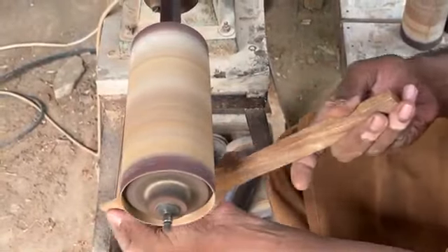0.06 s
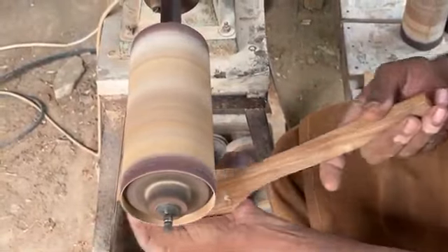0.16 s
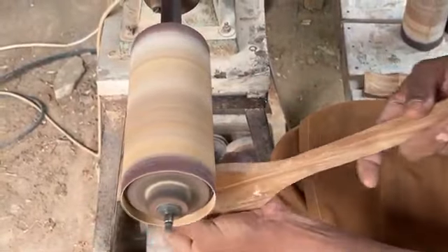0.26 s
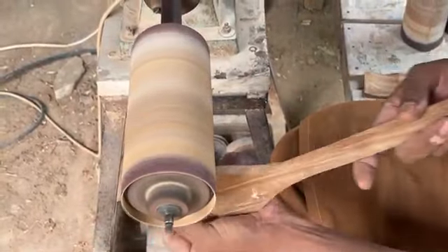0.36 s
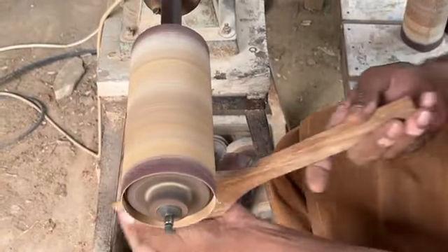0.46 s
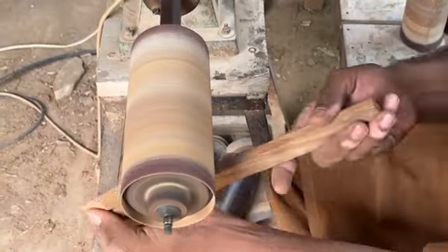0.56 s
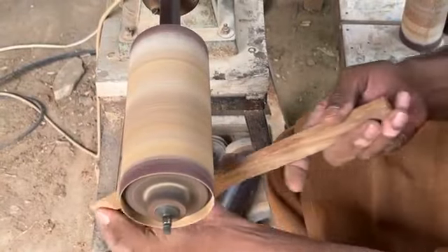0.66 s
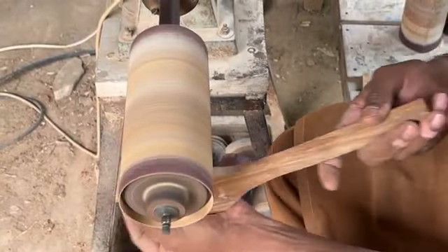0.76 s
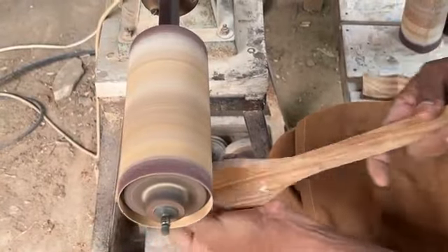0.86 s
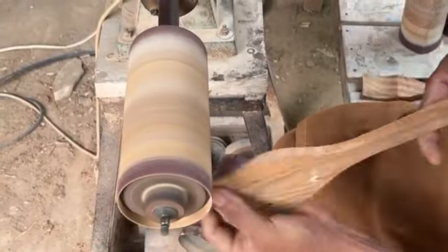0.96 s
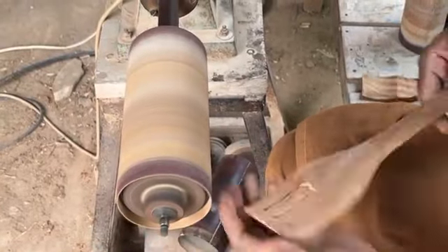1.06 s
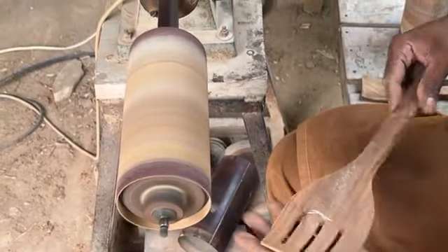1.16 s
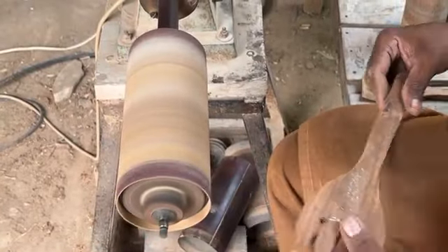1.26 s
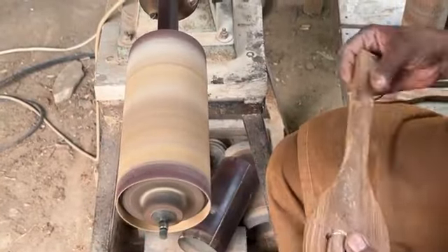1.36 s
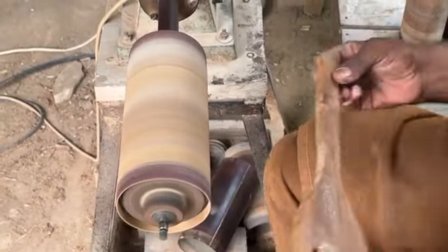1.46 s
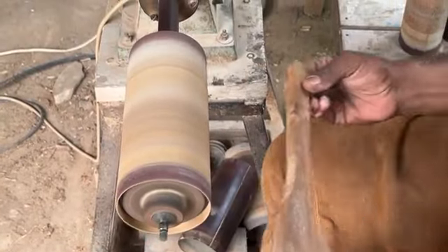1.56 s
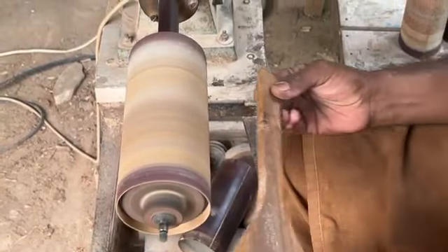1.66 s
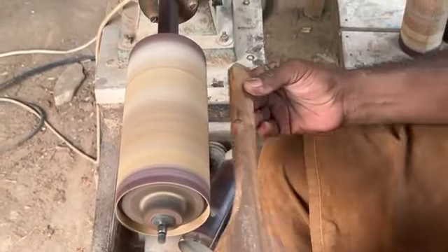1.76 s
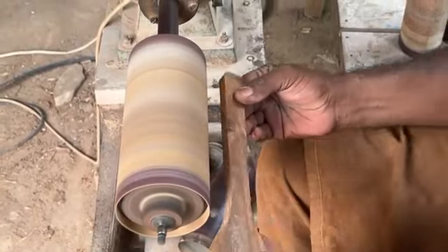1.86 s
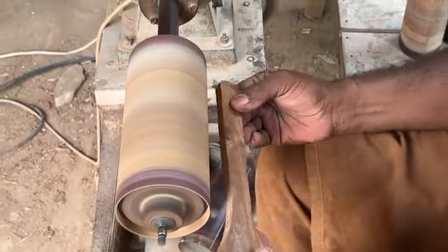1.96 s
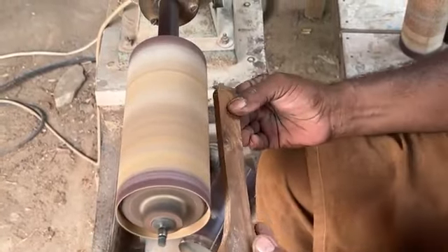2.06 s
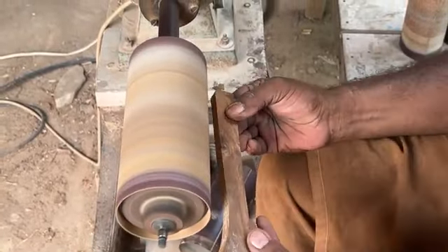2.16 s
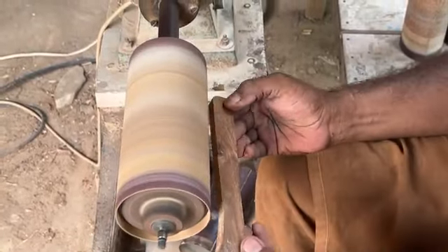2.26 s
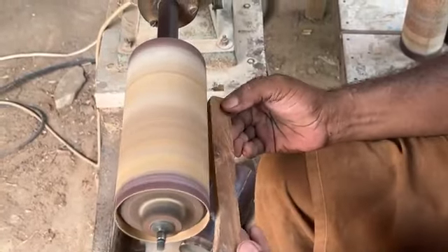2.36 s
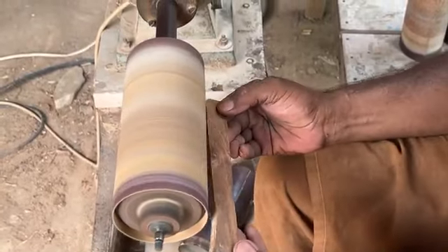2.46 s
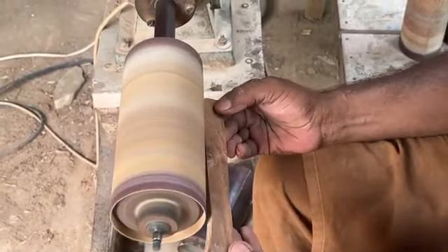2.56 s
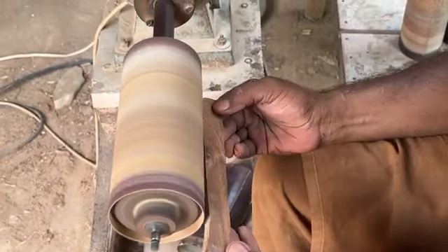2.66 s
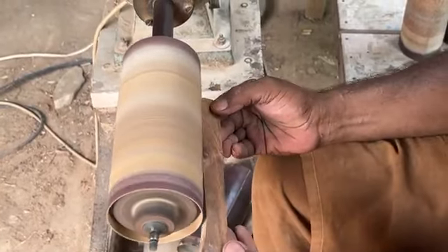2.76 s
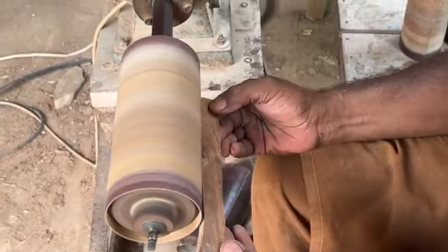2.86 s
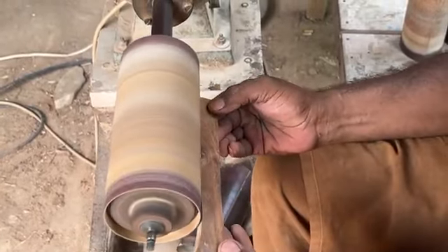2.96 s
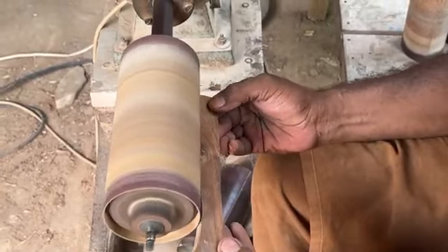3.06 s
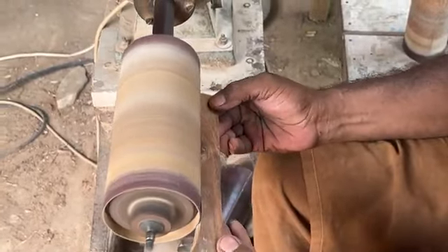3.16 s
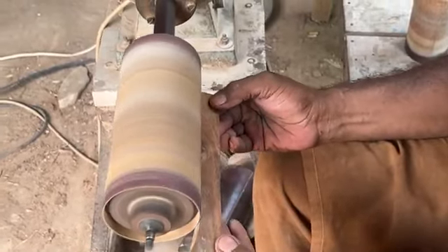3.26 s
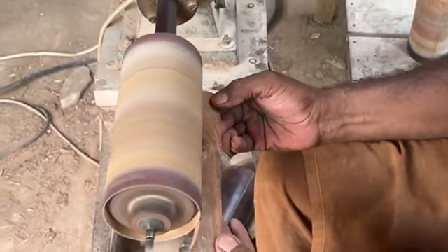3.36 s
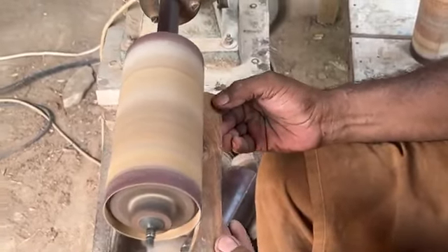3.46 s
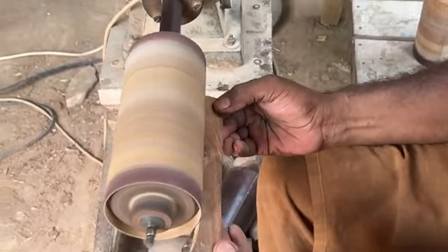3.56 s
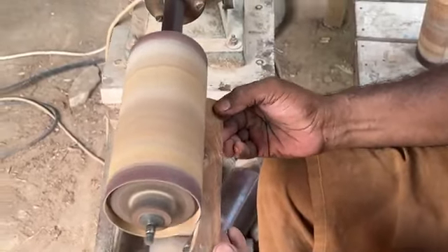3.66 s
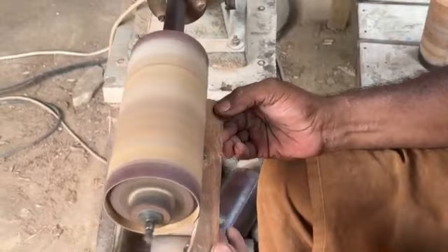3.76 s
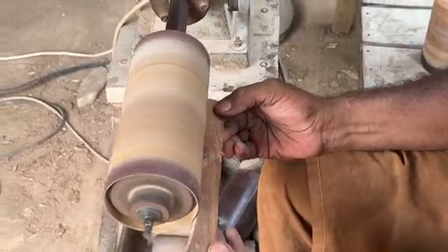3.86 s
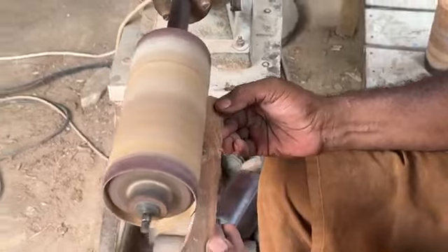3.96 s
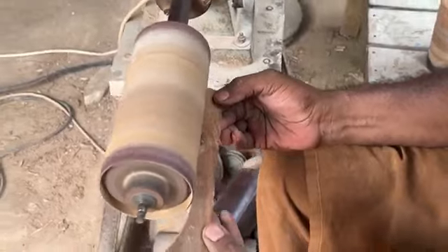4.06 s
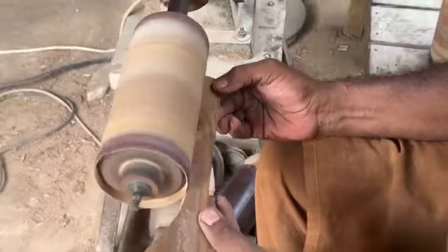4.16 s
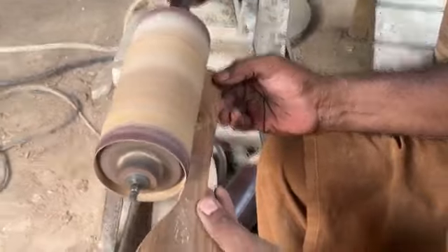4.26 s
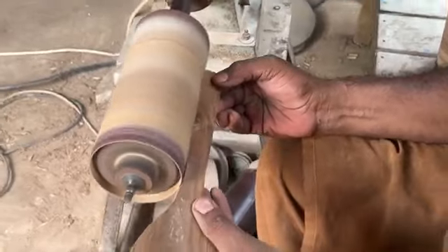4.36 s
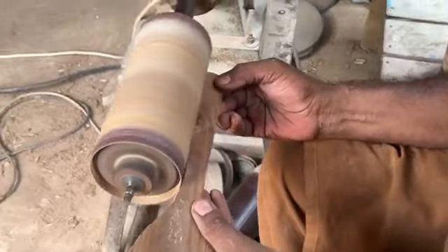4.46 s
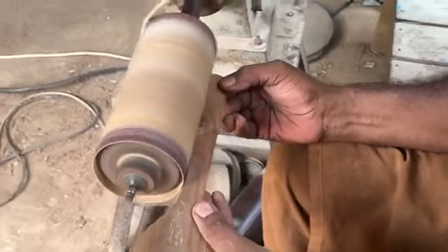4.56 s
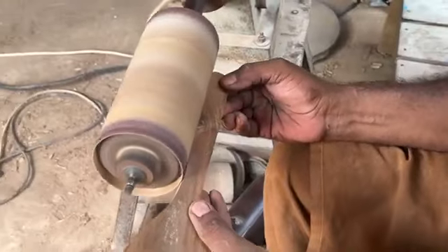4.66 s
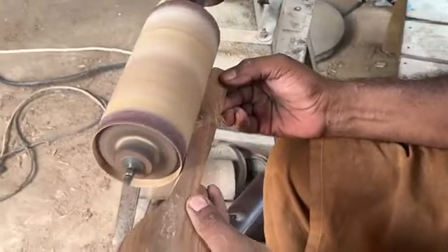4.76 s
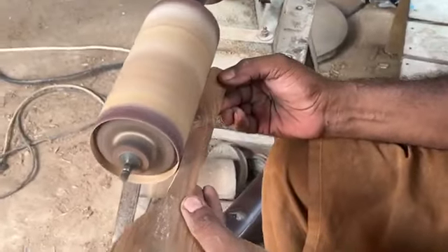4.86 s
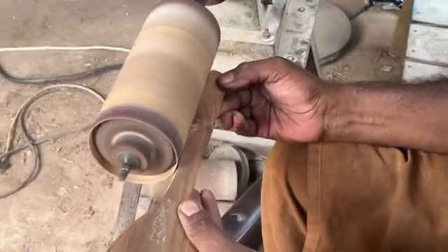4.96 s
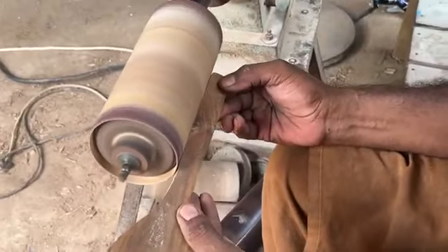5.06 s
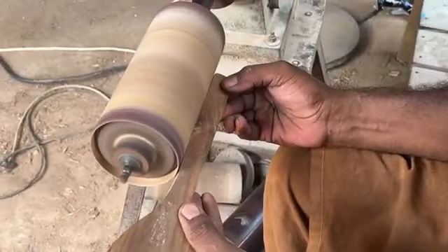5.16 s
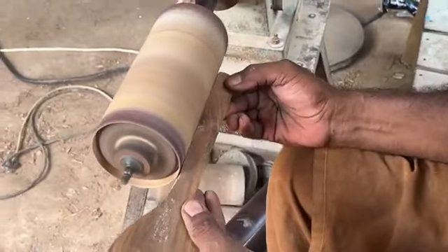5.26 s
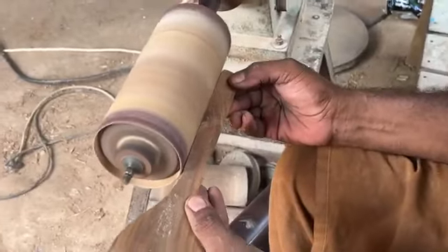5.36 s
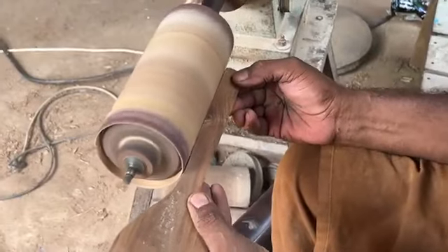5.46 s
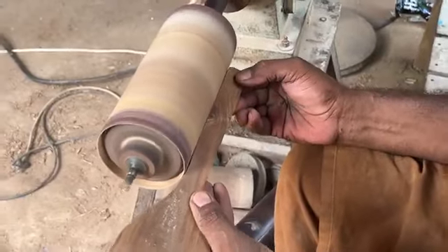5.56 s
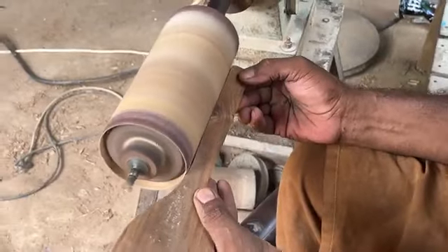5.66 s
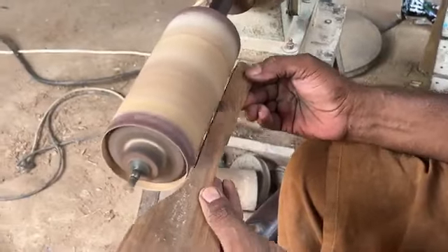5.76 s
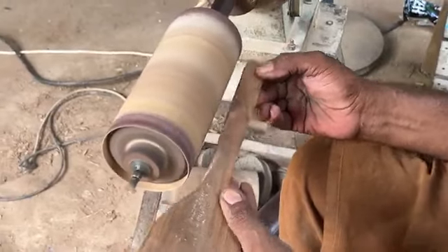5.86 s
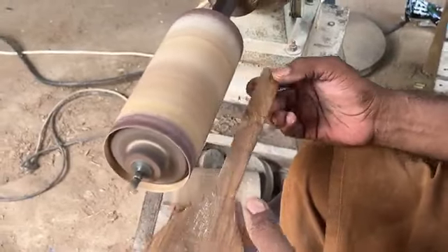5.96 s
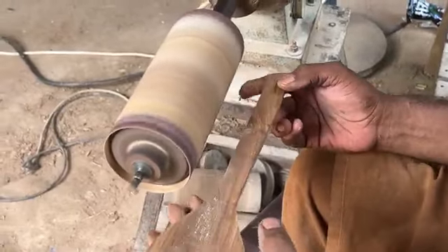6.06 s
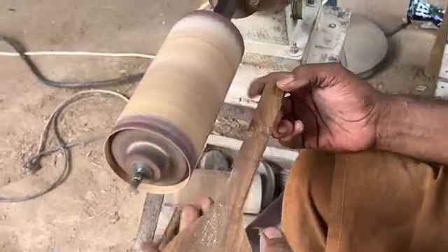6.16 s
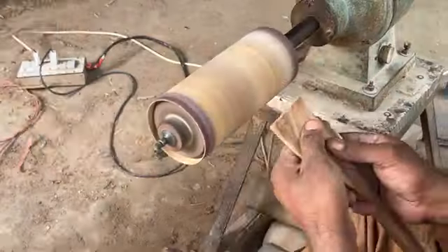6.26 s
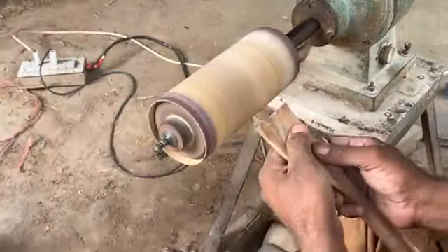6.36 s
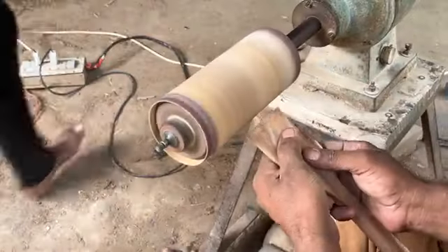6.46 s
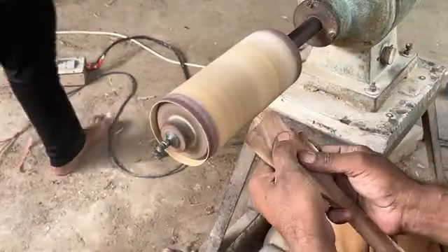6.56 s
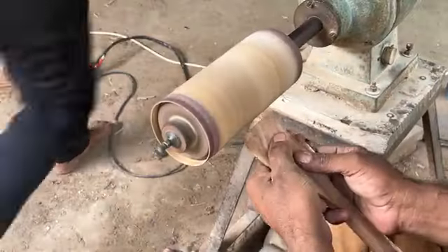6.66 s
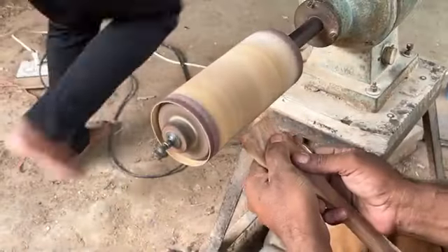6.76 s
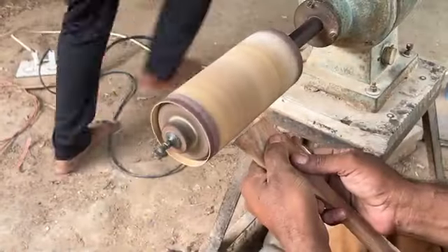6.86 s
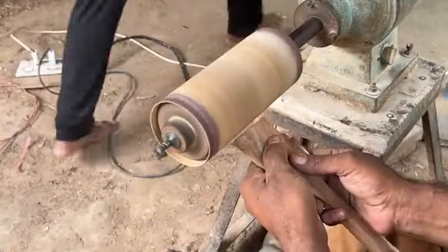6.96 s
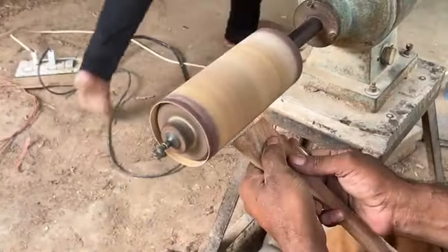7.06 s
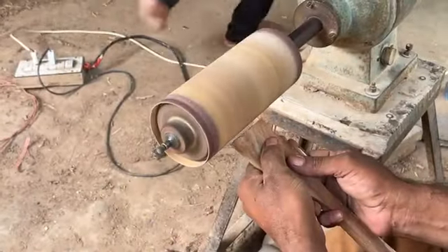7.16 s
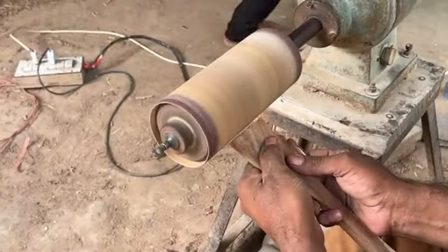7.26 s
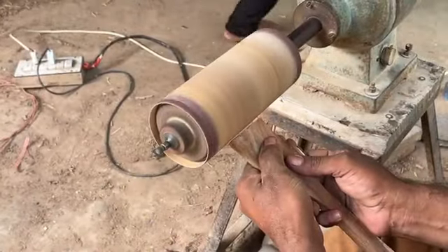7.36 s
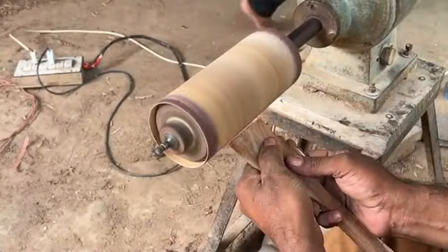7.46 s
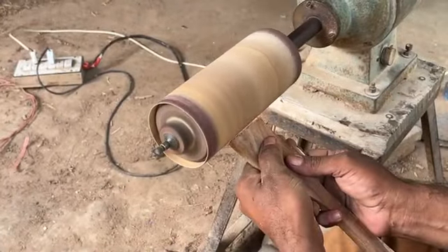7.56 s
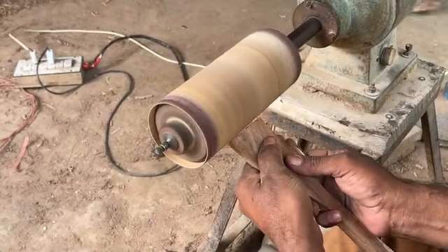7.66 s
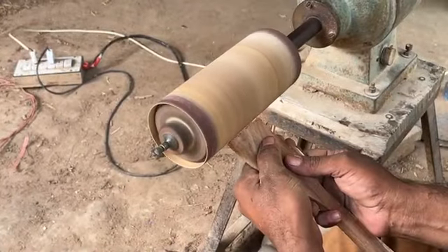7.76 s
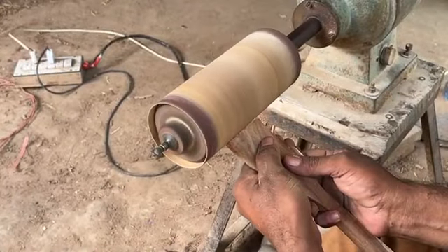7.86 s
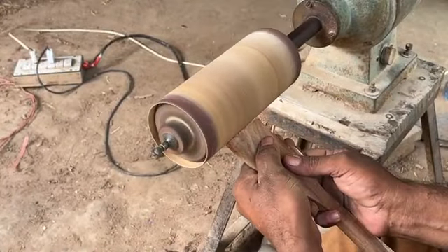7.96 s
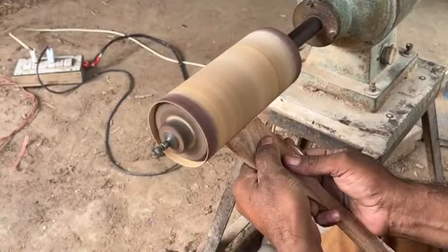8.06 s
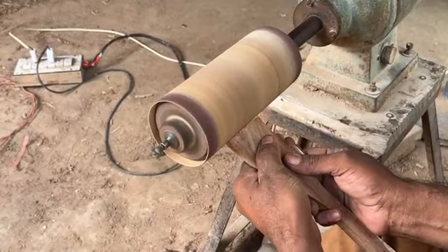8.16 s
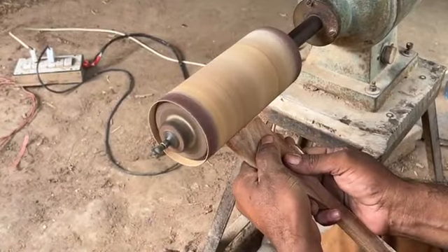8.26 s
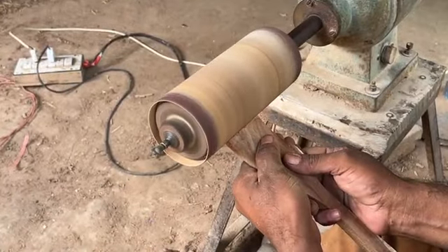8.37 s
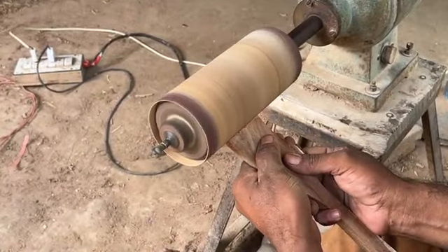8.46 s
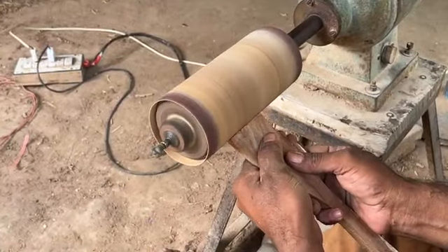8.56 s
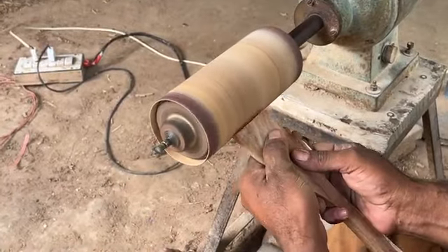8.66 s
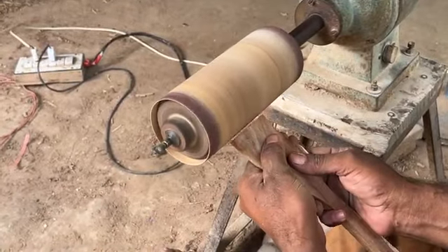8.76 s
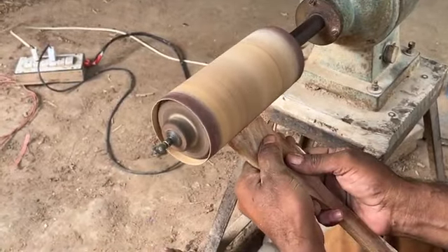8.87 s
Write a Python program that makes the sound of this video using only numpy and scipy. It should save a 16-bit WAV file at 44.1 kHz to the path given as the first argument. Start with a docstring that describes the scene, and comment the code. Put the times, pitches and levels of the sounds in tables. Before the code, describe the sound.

Close, open-air workshop sound: a motor-driven sanding drum runs throughout with a wavering, throbbing mid-pitched whine and airy whirr. A wooden piece touches it in two brief soft rasps, then a long loud gritty grind, a pause, a tiny touch and a second firm hiss. Low wind buffets the microphone, with little puffs between strokes.

```python
"""An open workshop, where a bench motor spins a sanding drum; its bearings whine and throb once a turn.
A wooden ladle is pressed to the drum in several strokes: light touches graze only the high spot, firm ones
hiss all round. Scratched grit, much of it returning every turn, drives the resonant modes of the wood.
Sines on the shaft and a resonating housing make the motor; shaped noise and falling puffs make the draught."""
import sys
import numpy as np
from scipy import signal
from scipy.fft import rfft, irfft, next_fast_len
from scipy.io import wavfile
from scipy.ndimage import uniform_filter1d

SR = 44100
rng = np.random.default_rng(int(sys.argv[2]) if len(sys.argv) > 2 else 0)


def transcribe(u):
    """Save the signal u as a 16-bit wav file named by the first command-line argument.

    u: samples, shape (n,) or (channels, n), limited to [-1, 1]; the rate is SR.
    q: integer samples, one column per channel.
    """
    v = np.clip(np.atleast_2d(u).T, -1, 1)
    q = np.round(v * 32767).astype(np.int16)
    wavfile.write(sys.argv[1], SR, q)


N = 393813
SIZE = next_fast_len(N)   # FFT length

# wood on drum: (start [s], end [s], press-in [s], ease-off [s], hiss grazing [dB], hiss pressed in [dB],
#   hiss before easing [dB], hiss at lift-off [dB], bounce grazing [nepers], bounce firm [nepers],
#   high spot at start [turns], at end [turns], top of hiss at start [dB], at end [dB],
#   lower wood modes [dB], landing [dB], lift-off kick [dB], hold [0 neck, 1 handle, 2 rim])
STROKES = [ (-.04, 0.324, 0.13, 0.1, -35.5, -25.5, -26, -35.5, .4, 0.078, 0.74, 0.82, 2, -19, 6, 10, -26, 0),
           (0.62, 0.944, 0.094, 0.13, -44.5, -29.5, -29.5, -39, 0.91, 0.078, 0.14, 0.24, 2, -27, 11, 15.5, -25, 0),
           (2.593, 5.812, 0.31, 0.069, -30.5, -23, -21.5, -24.5, 9.9, 0.32, 0.79, 0.9, -4.5, -8.5, 4.5, 27, 3, 1),
           (7.356, 7.408, 0.048, 0.022, -23, -30, -25, -31, 10, 2.4, 0.85, 0.84, 15, -10, 13, 3.5, -24, 2),
           (7.623, 8.687, 0.57, 0.06, -25.5, -20.5, -17.5, -26, 4.4, 0.96, .5, .8, -4, -5, 9, 5.5, -8, 2),
           (8.898, 8.921, 0.006, 0.009, -30, -21, -15, -27, 4.4, 5.1, 1, 0.85, -5, -5, 7, 3.5, -26, 2), ]
# the hand leans in and eases during the long stroke: (time [s], level [dB], added bounce [nepers])
LEAN = [(3.0, 2, 0.79), (3.5, 1.5, 0.063), (4.2, 1.5, 0.26), (4.65, 3, 0.25), (5.1, 2.5, 1), (5.4, 2, 1),
        (5.7, 0.5, 0)]
# the grip shifts along the wood: (time [s], modes near 2.7 kHz [dB], modes near 4.2 kHz [dB],
#   slide by which upper modes of the 2.7 and 5.5 kHz groups win over the lower [dB per semitone])
GRIP = [(2.6, -2, -5, 0), (2.92, 0, -2, 0), (2.97, -2, 8, 0), (3.06, -2, 8, 0), (3.13, 0, 0, 0),
        (3.4, 0, 0, -1.5), (3.9, 1, 0, 3), (4.3, 0, 0, -1.5), (4.7, 0, 0, -3), (5.4, 0, 0, 1.5),
        (5.8, 0, 0, 0), (7.7, -3, -3, 0), (7.88, -5, -2, 0), (7.93, 1, 0, -1), (8.13, 1, 4, -1),
        (8.3, 0, 3, 0), (8.35, 2, -1, 0), (8.65, 2, -2, 1.5)]
# what the ladle rings with in each hold: (pitch [Hz], width [Hz], level [dB])
NECK_MODES = [(2630, 250, -2.5), (3920, 800, 3.5), (4600, 590, 1), (5240, 360, -0.5), (6040, 1500, -12),
              (7050, 560, -5.5)]
HANDLE_MODES = [(142, 4.1, 13.5), (564, 180, 0.5), (1697, 25, 2), (2530, 100, -1), (2697, 114, 4),
                (2820, 220, 0.5), (3540, 960, -5.5), (4160, 200, 1.5), (4180, 1070, -2.5), (4730, 290, -6),
                (5270, 420, 3), (5680, 460, 5.5), (7030, 95, 5.5)]
RIM_MODES = [(888, 24, 13.5), (970, 47, 4.5), (1088, 28, 11), (1388, 26, 5.5), (1500, 23, -3.5),
             (2050, 890, -9), (2547, 47, 1.5), (2730, 75, -1.5), (3080, 130, -16), (3540, 2400, -5.5),
             (3940, 100, 7.5), (4380, 160, 0), (5130, 500, -7), (6940, 140, -3)]
# colour of the bare scratching: (pitch [Hz], level [dB])
SCRATCH_COLOUR = [(300, -50), (1000, -8.5), (2000, -10), (3000, -55), (7000, -124), (9000, -1.5),
                  (11000, 2), (13000, -1.5), (16000, 1)]
# shaft speed, sagging under load: (time [s], speed [turns per s])
SHAFT = [(0, 49.8), (3.0, 49.8), (3.3, 49.5), (3.6, 49.3), (4.2, 49.2), (5.8, 49.2), (6.05, 49.8),
         (7.35, 49.75), (7.8, 49.8), (8.1, 49.5), (8.65, 49.45), (8.93, 49.8)]
# motor as heard from the moving microphone, relative levels: (time [s], whine [dB],
#   upper housing mode against the whine [dB], other tones and modes [dB], upper whine against its mode [dB])
MOTOR = [(0.0, -25.5, -13, -30.5, 1), (1.69, -27.5, -9.5, -31.5, -5), (3.21, -23, -10, -29.5, -11),
         (3.38, -31, -4, -25.5, -9), (3.7, -25, -7.5, -25.5, -4), (5.82, -30.5, -8, -30.5, -17),
         (6.28, -31.5, -9, -33.5, 5), (6.4, -30.5, -6.5, -31.5, 3), (7.6, -29.5, -4.5, -32, 7.5),
         (8.4, -26, -6, -30, 0), (8.73, -32, 0.5, -30, 1.5), (8.93, -32.5, -7.5, -32.5, 11)]
# pitches of the two strong whines at idle speed: (lower [Hz], upper [Hz])
WHINE_HZ = (1351.5, 1789)
# strong whines, relative levels, lower whine first: (tone [dB], sideband two turns below [dB],
#   one turn below [dB], one turn above before the lift from load [dB])
WHINES = [(-36, -6.5, -5.5, -9), (-45, -11.5, -14, -19)]
# weaker bearing tones at idle speed: (pitch [Hz], relative level [dB])
BEARING_TONES = [(340, -47), (441.4, -49), (667.5, -47.5), (716, -51), (979.8, -54.5), (1104, -44),
                 (1127, -44), (1200, -46.5), (1335, -48.5), (1381, -47), (1431, -53), (2600, -50.5),
                 (2745, -52.5), (2912, -50.5), (3187, -56), (3284, -55.5), (3989, -52), (4360, -52)]
# motor housing resonances: (pitch [Hz], width of each of two passes [Hz], relative level [dB])
HOUSING = [(423.5, 53, -7), (636, 156, -18.5), (987.6, 70, -10), (1126, 67, -8), (1343, 82, -3.5),
           (1762, 133, -7.5), (2766, 600, -16), (3680, 210, -21), (4137, 170, -18), (4970, 83, -25.5)]
# colour of the air from fan and yard: (pitch [Hz], level [dB])
AIR_COLOUR = [(100, -12), (500, -5.5), (1250, -6), (1550, -9), (2000, -5.5), (4500, -16), (6000, -20),
              (9000, -25.5), (12000, -22.5), (15000, -32)]
# wind rumble on the microphone: (time [s], level [dB])
DRAUGHT = [(0, -36.5), (1.2, -37), (3.8, -35.5), (4.1, -49), (4.33, -44), (4.53, -29), (4.68, -47.5),
           (5.65, -41), (5.8, -49), (6.15, -39), (6.45, -33.5), (6.9, -38), (7.8, -41), (8.58, -31.5),
           (8.67, -34), (8.93, -33)]
# wind flutter: (time [s], level [dB])
GUSTINESS = [(0, -41), (3.8, -43), (4.1, -49), (6.1, -41.5), (6.4, -49), (7.8, -48.5), (8.93, -38)]
# colour of the rumble: (pitch [Hz], relative level [dB])
RUMBLE_COLOUR = [(20, -19), (41, 1), (65, 6.5), (176, -2.5), (250, -34), (320, -12), (550, -120)]
# colour of the flutter: (pitch [Hz], relative level [dB])
FLUTTER_COLOUR = [(60, -4.5), (150, 4.5), (250, 4.5), (400, -3), (650, -3), (1200, -73)]
# eddies on the ports: (time [s], relative level [dB], nominal pitch, swept from above to below it [Hz])
PUFFS = [(0.181, -28, 193), (0.281, -19, 70.6), (0.432, -18, 120), (0.523, -25, 225), (0.6, -24, 188),
         (0.71, -19, 310), (0.726, -20, 79), (0.803, -19.5, 122), (1.013, -31, 200), (1.224, -25.5, 250),
         (1.371, -22, 120), (1.717, -22, 118), (2.031, -25, 300), (2.078, -23, 260), (2.138, -25, 88.8),
         (2.247, -25, 133), (2.66, -19, 131), (2.715, -22.5, 247), (2.827, -23, 277), (3.274, -19.5, 75),
         (3.609, -23, 96), (3.745, -20, 152), (3.817, -23.5, 216), (5.632, -23, 143), (6.05, -22, 144),
         (6.621, -16.5, 96), (6.684, -24, 76.5), (6.898, -20.5, 85), (8.232, -22, 80.4), (8.434, -20.5, 87),
         (8.631, -20.5, 113), (8.67, -17, 116), (8.72, -23, 110), (8.848, -14, 132)]
# two ports in one body: (pitch [Hz], lead of the right port [radians])
PORT_LEAD = [(100, 0), (700, -.2), (1350, -.8), (2050, 0), (4800, 0), (5600, .85), (6900, 1.3),
             (8350, 3.14), (9650, 4.24), (11400, 6.2), (13100, 6.8), (15200, 9.42)]
# diffuse part, opposite in the two ports: (pitch [Hz], level [dB])
SPREAD = [(30, -26), (70, -20), (150, -11.5), (700, -11.5), (1500, -8.5), (2500, -11.5), (4500, -80),
          (6000, -24), (8000, -9), (14000, -34)]

IDLE_TURNS, START_TURN = 49.8, .09   # turns per s; turns
# likeness of one turn to the next, by hold; lost above this pitch
GRIT_MEMORY, GRIT_REPEAT_HZ = (.6, .85, .9), 6600
EVEN_NEPERS = 0.27   # bare scratching hardly follows a bounce smaller than this
SKIP_DB_PER_NEPER = .4   # a bouncing touch lands unevenly from turn to turn
PRESS_WAVER_DB, GRIP_WAVER_DB = .5, 1.1   # slow chance in the force and in each mode
# the sleeve's seam knocks below one pitch; grains drive the wood above the other
SEAM_DB, SEAM_HZ, GRAIN_HZ = -9, 2530, 1326
# the high spot digs in over this share of a turn and raps the wood, levels by hold; the rap is dull on top
KNOCK_DB, KNOCK_TURNS, RAP_DB, RAP_TOP_HZ = (-25, -8, 5), .12, (-40, -14, -4), 4800
LAND_S = 0.023   # the first touch is harder than the graze that follows
SETTLE_SHARE = 0.42   # bounce dies over this share of the press-in
# the wood skips over the last turns (added bounce in nepers), then is clear
LIFT_S, LIFT_BOUNCE, TAIL_S = 0.036, 1.55, 0.007
KICK_TOP_DB = -2   # the lift-off kick is duller than the hiss
TOP_DB_PER_NEPER, LOW_DB_PER_NEPER = -3, -1.25   # what bounce does to the top and to the lower modes
SPLIT_HZ = 8500   # body of the hiss below, top above
# speed loss at full load in turns per s; what load does to levels, and the share of waver it takes away
FULL_SAG, LOAD_WHINE_DB, LOAD_RUMBLE_DB, LOAD_WAVER = .6, 3, -3, .7
THROB_SLIP, LOAD_UPPER_DB = .25, 8   # radians the sidebands slip; load lifts the upper one
WAVER_DB, TONE_WAVER_DB, LUMPS_DB = 1.6, 1.8, 2.5   # slow swell of whines and tones, lumps in the wind
AIR_DB = -8.5   # against the motor's other tones and modes setting
OWN_WIND_DB = -25.5   # part of the wind that differs between the ports
CUTOFF_HZ = 15719


def from_db(db):
    """dB to gain."""
    return 10 ** (np.asarray(db) / 20)


def rms_one(x):
    """Scale to rms 1."""
    return x / np.sqrt(np.mean(x ** 2) + 1e-20)


def in_time(rows):
    """Columns of a timed table, sample by sample."""
    s, *columns = np.transpose(rows)
    return [np.interp(np.arange(N) / SR, s, c) for c in columns]


def at_bins(points):
    """A (pitch, value) table on the FFT grid, straight on a log axis."""
    hz, value = np.transpose(points)
    bins_hz = np.arange(SIZE // 2 + 1) * SR / SIZE
    return np.interp(np.log(bins_hz + 1), np.log(hz), value)


def coloured(x, spectrum):
    """Filter x by a spectrum in dB."""
    return irfft(rfft(x, SIZE) * from_db(at_bins(spectrum)), SIZE)[..., :N]


def band(x, hz, kind, order=2):
    """Butterworth filter."""
    return signal.sosfilt(signal.butter(order, hz, kind, fs=SR, output="sos"), x)


def drift(rate_hz):
    """Slow chance of spread 1, drawn every 40 samples."""
    r = np.exp(-80 * np.pi * rate_hz / SR)
    slow = signal.lfilter([1], [1, -2 * r, r * r], rng.standard_normal(N // 40 + 2002))[2000:]
    return np.interp(np.arange(N) / 40, np.arange(len(slow)), rms_one(slow))


def ring(x, hz, width_hz, db):
    """One damped resonance driven by x."""
    r = np.exp(-np.pi * width_hz / SR)
    a = [1, -2 * r * np.cos(2 * np.pi * hz / SR), r * r]
    return from_db(db) * signal.lfilter([(1 - r * r) / 2, 0, (r * r - 1) / 2], a, x)


def surface(turns, memory):
    """A rough surface passing by once a turn, changing a little each time."""
    spots = 1024
    fresh = rng.standard_normal((int(turns[-1]) + 22, spots))
    bumps = signal.lfilter([1], [1, -memory], fresh, axis=0)[20:]
    return rms_one(np.interp(turns * spots, np.arange(bumps.size), bumps.ravel()))


def grit(turns, memory):
    """One lane of grains: coarse ones return every turn, the finest are always new."""
    coarse = band(surface(turns, memory), GRIT_REPEAT_HZ, "low")
    return coarse + band(rng.standard_normal(N), GRIT_REPEAT_HZ, "high")


def once_a_turn(turns, bounce, rise=0.11):
    """Force rises steeply at the high spot and falls off round the drum; mean power about 1."""
    angle = turns % 1
    force = np.exp(-bounce * angle) - (1 - np.exp(-bounce)) * np.exp(-angle / rise)
    return force / np.sqrt(uniform_filter1d(force ** 2, size=1772))   # two turns


def clicks(turns):
    """One impulse at the start of each turn."""
    return rms_one(np.diff(np.floor(turns), prepend=0).clip(0, 1))


def touch(row):
    """One stroke of the hand in time: gain, bounce, high spot, top dB, lower modes dB."""
    (start, end, press, ease, graze_db, in_db, held_db, last_db, loose, firm,
     spot_a, spot_b, top_a, top_b, low_db, land_db, kick_db, _) = row
    t = np.arange(N) / SR
    since, until = np.clip(t - start, 0, 9), np.clip(end - t, 0, 9)
    lean_db, lean_bounce = in_time(LEAN)
    kick = from_db(kick_db) * (until < LIFT_S)
    skip = np.minimum(kick, 1)
    db = np.interp(t, [start, start + press, end - ease, end], [graze_db, in_db, held_db, last_db])
    db = db + land_db * np.exp(-since / LAND_S) + lean_db
    clear = np.exp(-np.clip(t - end, 0, 1) / TAIL_S)
    gain = from_db(db) * (1 + kick) * clear * (t >= start)
    settling = (loose - firm) * np.exp(-since / (SETTLE_SHARE * press))
    bounce = np.abs(firm + lean_bounce) + settling + LIFT_BOUNCE * skip
    spot = np.interp(t, [start, end], [spot_a, spot_b])
    top_db = np.interp(t, [start, end], [top_a, top_b]) + TOP_DB_PER_NEPER * bounce + KICK_TOP_DB * skip
    return gain, bounce, spot, top_db, low_db + LOW_DB_PER_NEPER * bounce


def in_group(hz):
    """Semitones of a mode above the middle of its group, 0 outside the groups."""
    if 2400 < hz < 3100:
        return 12 * np.log2(hz / 2690)
    return 12 * np.log2(hz / 5520) if 5200 < hz < 5900 else 0


def wood(lanes, modes, low_db, grip):
    """The ladle's modes ring in parallel with alternating signs; each swells and fades as the grip shifts."""
    near_2700_db, near_4200_db, slide_db = grip
    rings = 0
    for k, (hz, width_hz, db) in enumerate(modes):
        swell_db = (hz > GRAIN_HZ + 100) * GRIP_WAVER_DB * drift(1.6)
        swell_db = swell_db + (hz < 3200) * low_db + (2200 < hz < 3200) * near_2700_db
        swell_db = swell_db + (3700 < hz < 4600 and width_hz < 800) * near_4200_db
        swell_db = swell_db + in_group(hz) * slide_db
        # neighbouring modes listen to different lanes of grit
        rings = rings + (-1) ** k * from_db(swell_db) * ring(lanes[k % 2], hz, width_hz, db)
    return rings


def sanding(turns):
    """Grit scratches the wood, which rings in the modes of the present hold; also gives the wide hiss."""
    columns = np.transpose(STROKES)
    now = np.clip(np.searchsorted(columns[0], np.arange(N) / SR) - 1, 0, None)   # latest stroke begun
    gain, bounce, spot, top_db, low_db = (np.choose(now, c) for c in zip(*map(touch, STROKES)))
    gain = gain * from_db(SKIP_DB_PER_NEPER * bounce * drift(15.0))
    hold = columns[-1].astype(int)[now]
    spot_turns = turns + spot

    force = once_a_turn(spot_turns, bounce) * from_db(PRESS_WAVER_DB * drift(7.2))
    dig = np.exp(-(spot_turns % 1) / KNOCK_TURNS)
    knock = force + from_db(np.array(KNOCK_DB)[hold]) * dig
    seam_turns = turns + columns[11][now]   # the seam sits where the high spot ends up
    seam = from_db(SEAM_DB) * band(clicks(seam_turns), SEAM_HZ, "low")
    rap = from_db(np.array(RAP_DB)[hold] + 0.43 * drift(23.0)) * clicks(spot_turns)
    blows = seam + band(band(rap, RAP_TOP_HZ, "low"), SEAM_HZ, "high")

    even = once_a_turn(spot_turns, bounce ** 2 / (bounce + EVEN_NEPERS))
    grains = np.array([grit(turns, GRIT_MEMORY[1]), rng.standard_normal(N)])
    scratch, along = coloured(grains * even, SCRATCH_COLOUR)
    top, wide = (rms_one(band(v, SPLIT_HZ, "high", order=4)) for v in (scratch, along))
    bare = band(scratch, SPLIT_HZ, "low", order=4)

    seated = from_db(-1.2 * bounce)   # a light touch hardly sets the wood ringing
    grip = in_time(GRIP)
    low = 0
    for n, modes in enumerate((NECK_MODES, HANDLE_MODES, RIM_MODES)):
        lanes = [blows + band(grit(turns, GRIT_MEMORY[n]) * knock, GRAIN_HZ, "high", order=4)
                 for _ in range(2)]
        rings = wood(lanes, modes, low_db, grip)
        held = hold == n
        level = np.std((rings + bare)[held])
        low = low + held * gain * (seated * rings + bare) / level
    high = gain * from_db(top_db)
    # the contact is a line, so the two ports do not hear quite the same grains
    return low + high * top, high * wide * from_db(-10.0)


def whine(turns, waver, hz, db, *sides_db):
    """A bearing tone throbs through sidebands whole turns apart, wavering together."""
    angle = 2 * np.pi * hz / IDLE_TURNS * turns + 0.36 * drift(0.32)
    sides = 0
    for k, side_db in zip((-2, -1, 1), sides_db):
        load_db = (k > 0) * LOAD_UPPER_DB * (1.5 - waver)
        level = from_db(side_db + load_db + 2.0 * waver * drift(3.4))
        slip = THROB_SLIP * waver * drift(1.3)
        sides = sides + level * np.sin(angle + 2 * np.pi * k * turns + slip)
    return from_db(db + 30.5 + WAVER_DB * waver * drift(1.54)) * (np.sin(angle) + sides)


def motor(turns):
    """Wavering bearing tones follow the shaft; a rumble that throbs each turn rings the housing."""
    whine_db, upper_db, rest_db, sharp_db = in_time(MOTOR)
    # load steadies the shaft: whines up, rumble down, a share of the waver lost
    load = np.clip((IDLE_TURNS - in_time(SHAFT)[0]) / FULL_SAG, 0, 1)

    def heard(hz):
        """The two strong housing modes beam, so they change with load and the microphone's place."""
        if 1600 < hz < 1900:
            return from_db(whine_db + upper_db + 9.0)
        return from_db(whine_db if 1230 < hz < 1600 else rest_db)

    tones = 0
    for hz, db in BEARING_TONES:
        level = heard(hz) * from_db(db + 32.5 + TONE_WAVER_DB * drift(6.6))
        tones = tones + level * np.sin(2 * np.pi * hz / IDLE_TURNS * turns + 0.48 * drift(1.0))
    whines = 0
    for k, hz in enumerate(WHINE_HZ):
        level = heard(hz) * from_db(k * sharp_db)   # only the upper whine has its own setting
        whines = whines + level * whine(turns, 1 - LOAD_WAVER * load, hz, *WHINES[k])
    rumble = surface(turns, memory=0.31) * (1 + .65 * np.cos(2 * np.pi * turns))
    rings = 0
    for hz, width_hz, db in HOUSING:
        rings = rings + heard(hz) * ring(ring(rumble, hz, width_hz, db), hz, width_hz, 0)
    rest = tones + from_db(19.0) * rings
    return from_db(LOAD_WHINE_DB * load) * whines + from_db(LOAD_RUMBLE_DB * load) * rest


def air():
    """Fan and yard as coloured noise, its level following the motor's other tones and modes."""
    rest_db = in_time(MOTOR)[2]
    return from_db(AIR_DB + rest_db) * rms_one(coloured(rng.standard_normal(N), AIR_COLOUR))


def eddy(db, hz):
    """A puff of wind pops as a few falling cycles."""
    t = np.arange(int(.06 * SR)) / SR
    cycles = hz * (0.682 * t + 0.008 * (1 - np.exp(-t / 0.0051)))
    swell = (t / 0.0032 * np.exp(1 - t / 0.0062)) ** 0.83
    return from_db(db - 5.5) * np.sin(2 * np.pi * cycles) * swell


def draught():
    """Lumpy low noise and eddies buffet the microphone; also gives the wind that differs between ports."""
    (rumble_db,), (flutter_db,) = in_time(DRAUGHT), in_time(GUSTINESS)
    lumps_db = LUMPS_DB * drift(15.6)
    rumble_gain = from_db(rumble_db + lumps_db + 0.84 * drift(59.0))
    rumble, own = rumble_gain * rms_one(coloured(rng.standard_normal((2, N)), RUMBLE_COLOUR))
    flutter_gain = from_db(flutter_db + lumps_db + 4.0 * drift(19.0))
    flutter = flutter_gain * rms_one(coloured(rng.standard_normal(N), FLUTTER_COLOUR))
    wind = rumble + flutter
    for s, db, hz in PUFFS:
        puff = eddy(db, hz)
        i = round(s * SR)
        wind[i:i + len(puff)] += puff[:N - i]
    return wind, from_db(OWN_WIND_DB) * (own + flutter[::-1])


def ports(x):
    """Each port hears the sound with half the phase lead, plus a diffuse copy of opposite sign."""
    half = np.exp(.5j * at_bins(PORT_LEAD))
    tail = rng.standard_normal(8000) * np.exp(-np.arange(8000) / 2000)
    side = coloured(signal.fftconvolve(x, tail / np.linalg.norm(tail))[:N], SPREAD)
    left, right = (irfft(rfft(x, SIZE) * lead, SIZE)[:N] for lead in (1 / half, half))
    return np.array([left + side, right - side])


def scene():
    """Drum, motor, air and draught at the two ports."""
    turns = START_TURN + np.cumsum(in_time(SHAFT)[0]) / SR
    hiss, wide = sanding(turns)
    wind, own = draught()
    shared = hiss + motor(turns) + air() + wind
    return ports(shared) + (wide + own) * [[1], [-1]]


def record(dry):
    """The deepest bass and the top are cut."""
    return signal.sosfilt(signal.cheby2(14, 60, CUTOFF_HZ, fs=SR, output="sos"), band(dry, 41, "high"))


dry = scene()
out = record(dry)
transcribe(out)
```